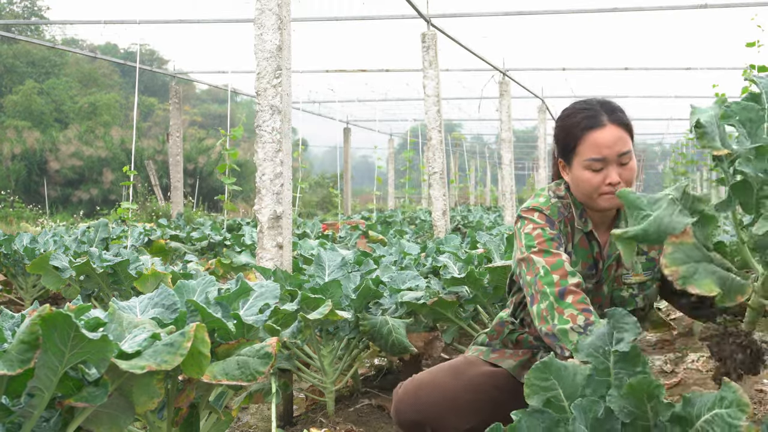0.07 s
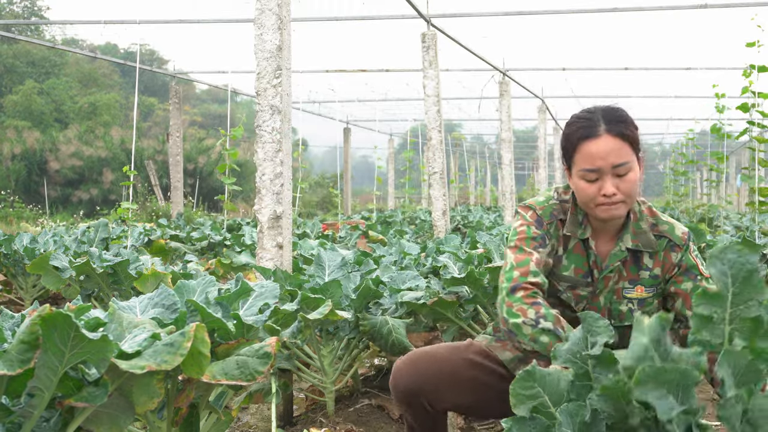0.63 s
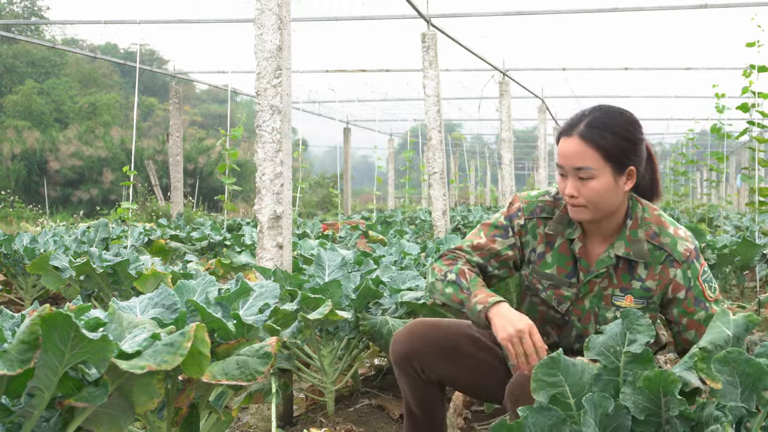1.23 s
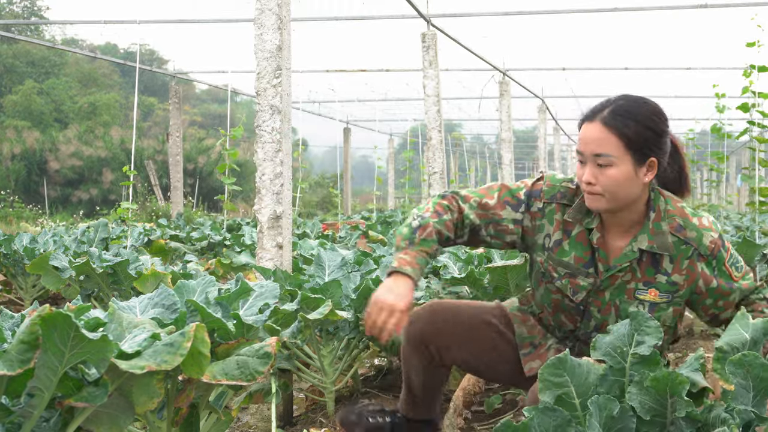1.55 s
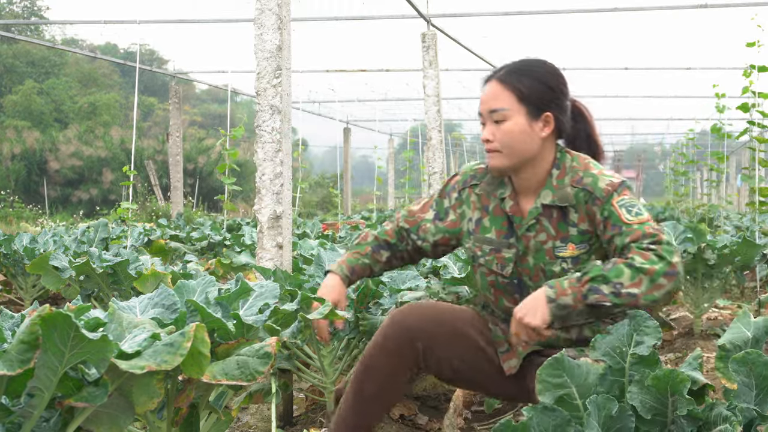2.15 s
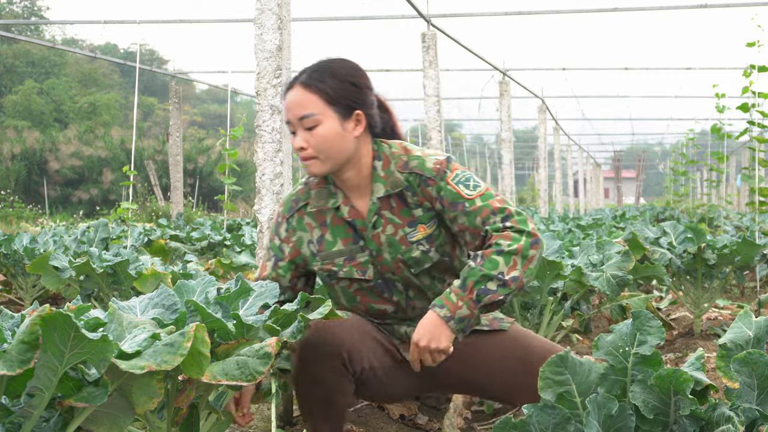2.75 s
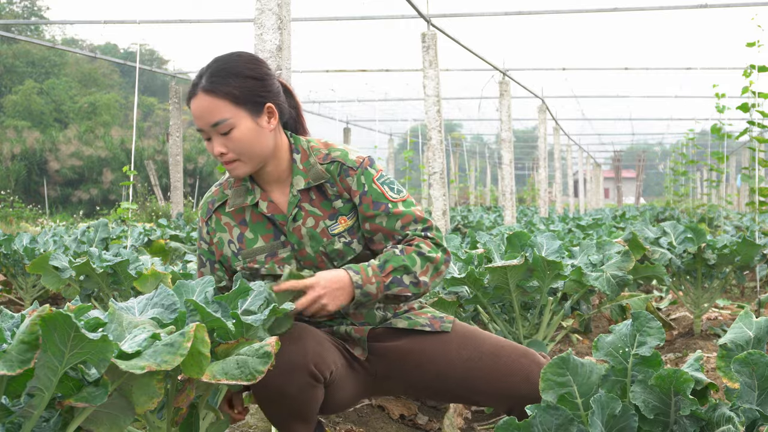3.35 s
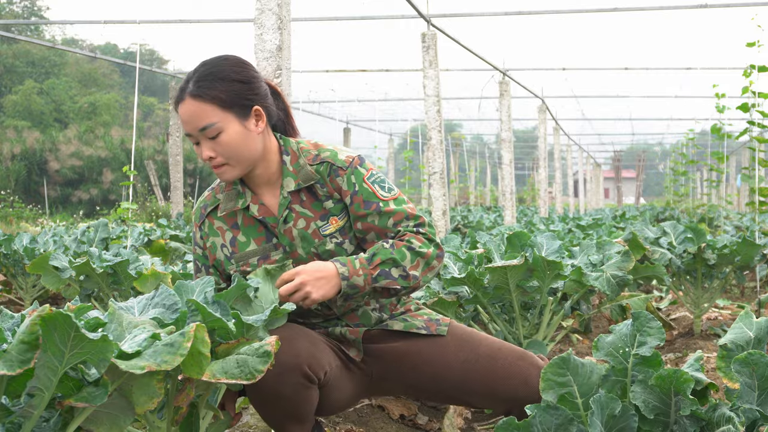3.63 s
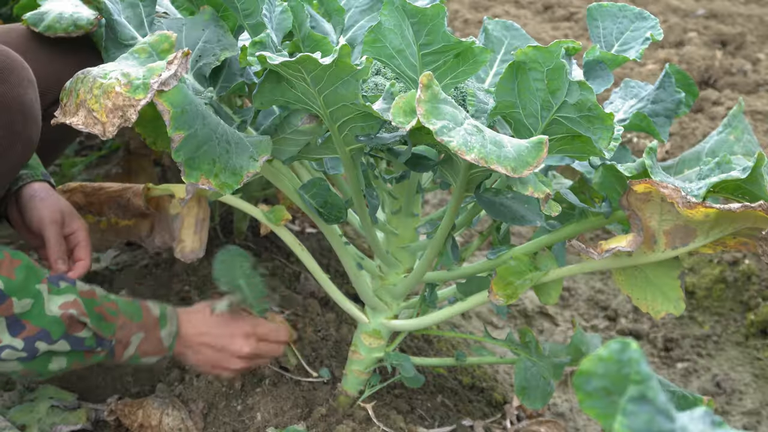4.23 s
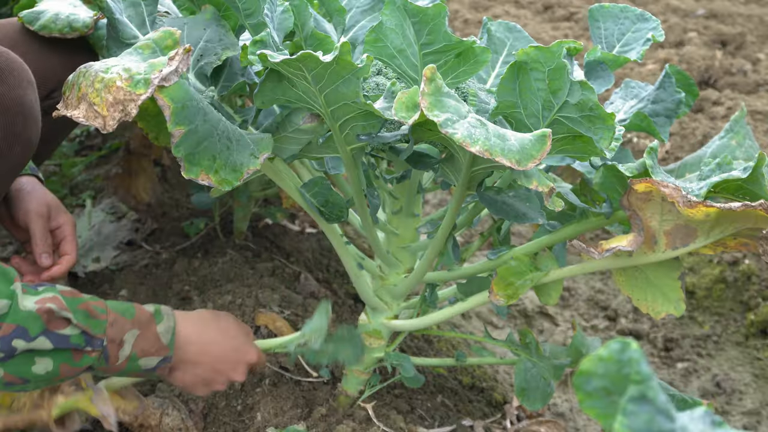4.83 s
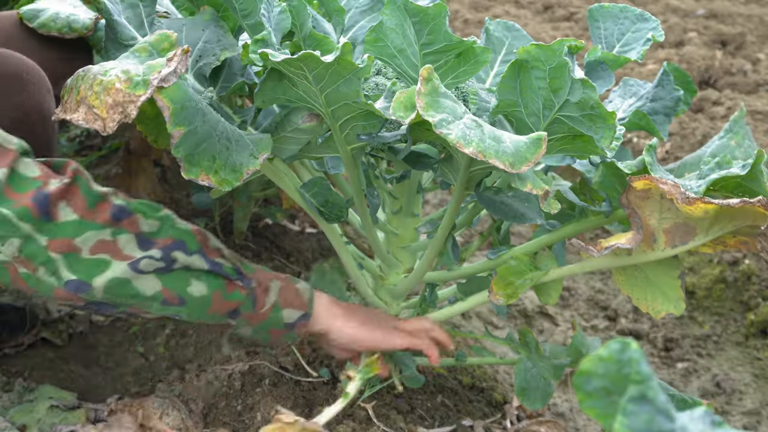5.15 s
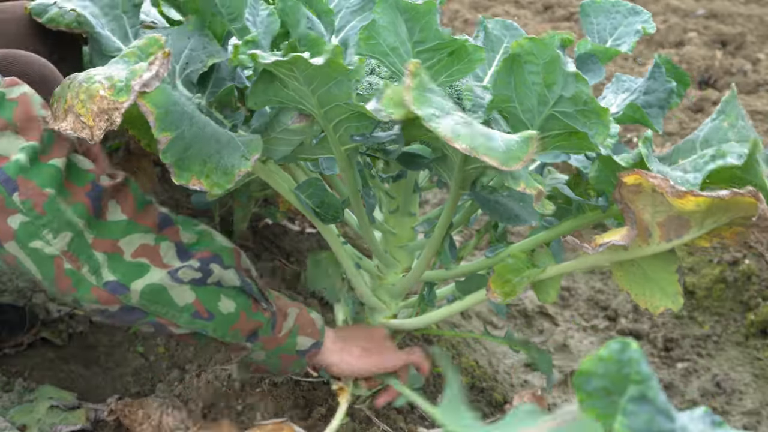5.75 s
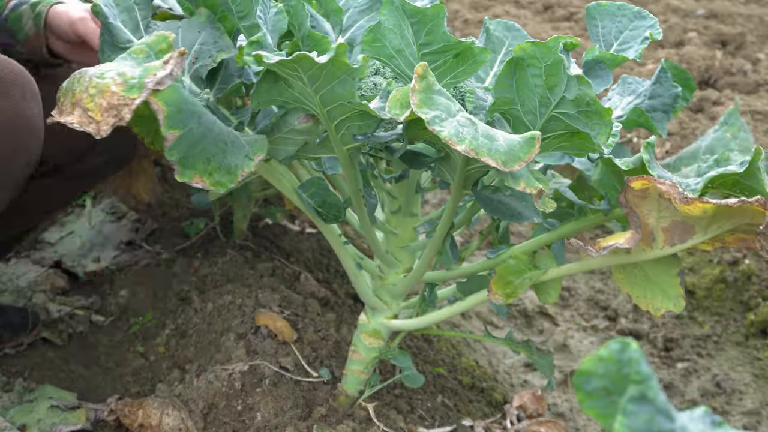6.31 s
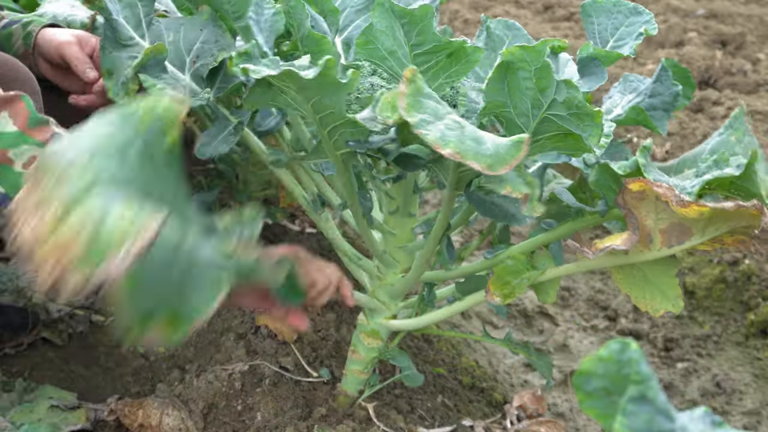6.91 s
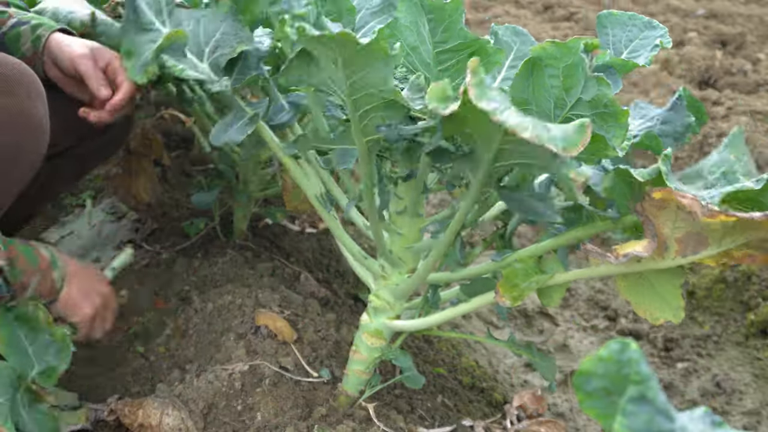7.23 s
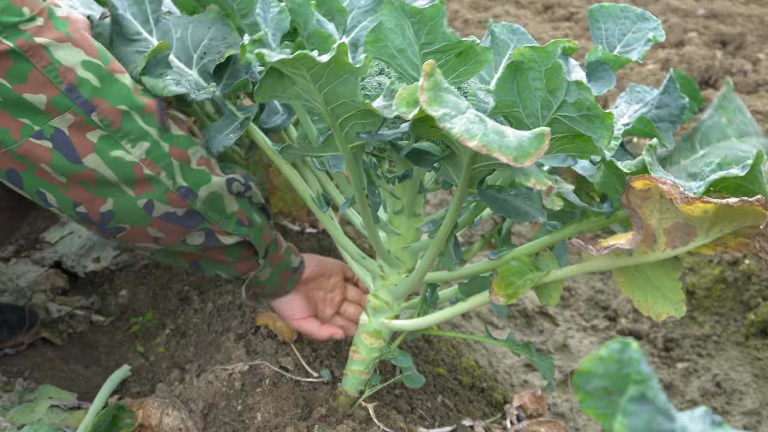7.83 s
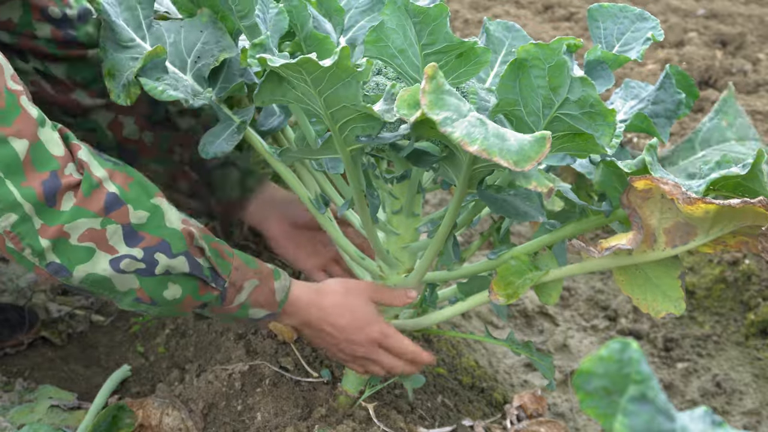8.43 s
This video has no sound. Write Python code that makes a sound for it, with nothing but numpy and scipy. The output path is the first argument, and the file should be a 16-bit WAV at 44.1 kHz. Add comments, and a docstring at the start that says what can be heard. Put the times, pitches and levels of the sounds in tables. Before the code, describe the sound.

In an open field, with a steady hush, low distant traffic and scattered birdsong, hands work on a leafy vegetable close to the microphone. Leaves rustle first, then after a quieter spell come juicy snaps of stalks, stem knocks, a short creak and quick brushes of sleeve and leaf. Near the end a thick stalk cracks loudly and the root thuds softly, while a thin, far horn holds one blast.

```python
"""Leaves are broken off a cauliflower by hand, over far road rumble, an engine and the hush of a field.
A big leaf is laid aside, rustling in tiny slips and crinkling; birds whistle and call from 1 s.
Insect hiss fades by 4 s. Then stalks crack as fibres tear, the stem knocks, a twisted stalk creaks.
A nearer bird sings at 5.6 s. A far horn starts one blast at 6.8 s; during it the thickest stalk
gives way and the root thuds in the soil."""
import sys
import numpy as np
from scipy import signal
from scipy.io import wavfile

SR = 44100
rng = np.random.default_rng(int(sys.argv[2]) if len(sys.argv) > 2 else 0)


def wav_record(signal):
    """Record a signal, one row per channel, as 16-bit PCM in the file named by sys.argv[1]."""
    frames = np.transpose(np.atleast_2d(signal))
    bounded = np.clip(frames, -1, 1)
    # unit amplitude maps onto the largest positive 16-bit level
    quanta = np.round(bounded * 32767).astype(np.int16)
    wavfile.write(sys.argv[1], SR, quanta)


N = 377937
TIME_S = np.arange(N) / SR

# far road: t/s, rel. level/dB
ROAD_LEVEL = [(0, -51), (1.3, -50.3), (1.7, -51.8), (3.9, -51.5), (4.3, -47.8), (5.4, -50.8), (6.0, -48.3),
              (7.1, -48.3), (7.55, -50.5), (7.85, -47.3), (8.57, -48.7)]
# road spectrum: f/Hz, rel. density/dB
ROAD_SPECTRUM = [(28, -28), (40, -1), (55, 3), (75, 5.5), (120, 5), (170, 0.5), (240, -12), (330, -19)]
# engine: t/s, level/dB
ENGINE_LEVEL = [(0, -68), (.3, -44), (.48, -58), (.7, -47), (1.9, -59), (4.7, -65), (5.1, -57), (8.57, -56)]
# insects: t/s, level/dB
INSECT_LEVEL = [(0, -66.5), (2, -67), (3.6, -67.5), (3.9, -80)]
# field hush: t/s, level/dB
HUSH_LEVEL = [(0, -50), (1.5, -49.5), (3.3, -49.5), (3.9, -52), (5, -49), (7, -49.5), (8.57, -50)]
# hush spectrum: f/Hz, rel. density/dB
HUSH_SPECTRUM = [(200, -7), (400, -3), (800, -2.5), (1400, 0), (2200, 0.5), (3400, 3.5), (5000, 0),
                 (6500, -4), (8300, -21.5), (10000, -20), (15500, -28)]
# road and hush: f/Hz, L-R correlation
FIELD_CORRELATION = [(60, .999), (150, 0.99), (600, 0.66), (1500, 0.806), (3000, 0.71), (5000, 0.59),
                     (12000, 0.133)]
# leaf rubbing, one curve per handling: t/s, rel. body/dB, rel. treble/dB
HANDLINGS = [
    [(0.2, -58, -67), (0.38, -46.8, -60), (0.55, -45, -57), (0.66, -41, -54), (0.8, -47, -58.5),
     (1.15, -51, -76), (1.6, -55.5, -75)],
    [(4.04, -56, -75), (4.09, -49, -75), (4.19, -56, -75), (4.55, -55.5, -74)],
    [(4.66, -51, -58), (4.8, -50.5, -58), (5.08, -49, -53), (5.21, -45, -53), (5.4, -56, -61)],
    [(5.66, -54, -63), (5.74, -42, -53), (5.92, -46.5, -57), (6.11, -42.5, -54), (6.19, -56.5, -62)],
    [(6.38, -50.5, -71), (6.56, -48.5, -69), (6.77, -48.5, -57), (6.94, -56, -61), (7.11, -46, -57),
     (7.23, -51, -65), (7.42, -48.5, -70), (7.8, -53.5, -68)],
    [(7.95, -54.7, -71), (8.35, -53.5, -75), (8.57, -48, -72)],
]
# rubbing spectrum: f/Hz, rel. density/dB
LEAF_SPECTRUM = [(150, -7), (350, -2), (700, -2), (1000, -1), (1400, -1), (2600, 3), (4500, -1),
                 (7000, -18.5), (10000, -20.5), (15500, -31)]
# rubbing: f/Hz, L-R correlation
LEAF_CORRELATION = [(200, 0.83), (2000, 1), (5000, 1), (12000, 0.23)]
# wipes of hand, sleeve and leaf: t/s, length/s, level/dB, f/Hz
WIPES = [(0.298, 0.033, -51, 1300), (1.997, 0.025, -54.5, 560), (4.21, .09, -54, 2240),
         (4.65, 0.025, -45, 11000), (4.683, 0.021, -37.5, 10300), (4.763, 0.044, -46, 3320),
         (4.885, .13, -46, 4120), (5.157, 0.037, -41, 2800), (5.3, 0.061, -45.5, 3850),
         (5.841, 0.044, -36, 3900), (6.353, 0.046, -43, 4630), (6.42, 0.04, -46, 3630),
         (6.482, 0.033, -42.5, 2080), (6.549, 0.088, -45.5, 1440), (6.75, .052, -48, 3850),
         (7.072, 0.029, -34.5, 4170), (7.307, 0.059, -41, 3020)]
# stalks and ribs breaking: t/s, crack level/dB, crack f/Hz, pop level/dB, pop f/Hz
CRACKS = [(0.471, -36, 3000, -26, 1460), (0.7368, -16.5, 4700, -30, 2500), (4.0593, -20, 5050, -18, 2360),
          (4.1, -25, 2900, -22.5, 1820), (4.208, -41, 2600, -30.5, 1840),
          (4.4008, -39.5, 2800, -34.5, 3000), (5.1535, -25.3, 5640, -28, 2230),
          (5.206, -25.5, 4000, -23, 3050), (5.337, -34, 5470, -31, 1990), (5.6731, -8, 3900, -16, 3860),
          (6.3593, -31.5, 5600, -46, 2500), (6.4785, -30.5, 4000, -30, 1494), (6.607, -33, 2400, -32, 1040),
          (6.8415, -22, 8900, -40, 3750), (7.0347, -7.5, 4800, -7, 2400), (7.055, -25, 6000, -27, 2280),
          (7.085, -33, 5000, -25, 2300), (7.0906, -15.5, 7420, -21, 2300)]
# large far birds: t/s, length/s, f/Hz, level/dB
HOARSE_CALLS = [(1.001, 0.24, 1452, -60), (2.738, 0.18, 1437, -59.5), (5.319, 0.11, 780, -52.7),
                (8.107, .18, 805, -57.5)]
# single bird notes: t/s, length/s, start f/Hz, end f/Hz, rel. level/dB
SINGLE_NOTES = [(1.346, .05, 3600, 2600, -48.5), (1.773, .06, 5300, 4800, -51.5),
                (2.307, .12, 5700, 4700, -55.5), (3.345, .018, 5100, 3700, -42),
                (3.488, .11, 4550, 4350, -49.5), (3.58, .021, 4900, 4750, -44),
                (4.985, .1, 6900, 6650, -52), (5.083, .038, 6000, 5400, -44.5),
                (5.21, .07, 5600, 5400, -48.5), (5.366, .19, 4750, 3880, -49.7),
                (5.604, .026, 6050, 5850, -34), (7.565, .041, 6250, 6350, -52),
                (7.718, .077, 5700, 4000, -52), (7.797, .13, 5050, 4950, -54.5)]
# two ticks, arched fall, rise: offset/s, length/s, start f/Hz, mid f/Hz, end f/Hz, rel. level/dB
SWOOP_MOTIF = [(0, .034, 7750, 7250, 6200, -9), (.038, .028, 7750, 7200, 6300, -7.5),
               (.142, .036, 5500, 5900, 6050, -5), (.176, .082, 6050, 4720, 3260, 0),
               (.387, .046, 3200, 3680, 4650, -2.3)]
# its repeats: t/s, rel. level/dB, time stretch
SWOOP_REPEATS = [(2.673, -47.3, .99), (3.158, -43.8, 1.01), (3.661, -52.5, 1.02)]
# stem jolts: t/s, level/dB, pitch ratio
STEM_JOLTS = [(5.674, -15.5, 1.0), (7.0352, -17, .65), (4.06, -34.5, 2.1), (4.686, -39, 1.201),
              (4.697, -34.5, 1.25), (7.055, -29, 0.74), (7.0906, -27.5, 0.69)]
# stem and leaf modes at ratio 1: f/Hz, rel. level/dB, t60/s
STEM_MODES = [(330, -13, 0.055), (417, -7, 0.022), (553, -6, 0.02), (710, -4, 0.026), (892, -4, 0.025),
              (1140, -2, 0.0088), (1500, -1, .014), (1630, 0, 0.0197), (2040, -11.5, 0.038),
              (2330, -6.5, 0.019), (2880, -10, 0.03), (3460, -5, 0.013), (4070, -29, 0.0084)]
# two rising whistles amid flicks: offset/s, length/s, start f/Hz, mid f/Hz, end f/Hz, rel. level/dB
SLUR_MOTIF = [(0, .009, 6300, 5450, 4750, -.5), (.018, .04, 4750, 4750, 4980, -1.5),
              (.051, .009, 5200, 5700, 6500, -8), (.066, .06, 4500, 4800, 5150, 1),
              (.123, .008, 5250, 5950, 6800, -3)]
# its repeats: t/s, rel. level/dB, time stretch
SLUR_REPEATS = [(5.756, -35.5, 1), (5.979, -35, 1.08)]
# horn partials: f/Hz, rel. level/dB
HORN_SPECTRUM = [(3295, -5.5), (3335, -6), (3745, -6), (3797, -2), (4160, -12), (4275, -15)]

SWOOP_PAN_DB, SLUR_PAN_DB, CHIRP_PAN_DB = 6.5, -2, 5   # left minus right


def from_db(db):
    """Decibels to gain."""
    return 10 ** (np.asarray(db) / 20)


def unit_rms(x):
    """Scale to rms 1."""
    return x / np.sqrt(np.mean(x ** 2) + 1e-20)


def gains(curve):
    """Gain over time per dB column; zero from 50 ms outside the curve."""
    times, *columns = np.transpose(curve)
    inside = (TIME_S >= times[0] - .05) & (TIME_S <= times[-1] + .05)
    out = np.zeros((len(columns), N))
    out[:, inside] = [from_db(np.interp(TIME_S[inside], times, db)) for db in columns]
    return out


def at_hz(points, hz):
    """Interpolate over log frequency."""
    points_hz, values = np.transpose(points)
    return np.interp(np.log(hz), np.log(points_hz), values)


def band(x, low_hz, high_hz, order=2):
    """Causal band-pass."""
    edges_hz = [min(low_hz, .35 * SR), min(high_hz, .45 * SR)]
    return signal.sosfilt(signal.butter(order, edges_hz, "band", fs=SR, output="sos"), x)


def add(out, at_s, sound):
    """Mix a sound in, in place."""
    start = max(round(at_s * SR), 0)
    out[..., start:start + sound.shape[-1]] += sound[..., :max(N - start, 0)]


def white():
    """Two independent white noises."""
    return rng.standard_normal((2, N))


def stereo(mid, side, correlation):
    """Two independent signals to a correlated pair."""
    return np.sqrt((1 + correlation) / 2) * mid + np.sqrt((1 - correlation) / 2) * np.array([side, -side])


def coloured(spectrum, correlations, excite):
    """Stereo noise shaped in half-octave bands; rms 1."""
    low_hz, high_hz = spectrum[0][0], spectrum[-1][0]
    edges_hz = np.geomspace(low_hz, high_hz, round(2 * np.log2(high_hz / low_hz)) + 1)
    sources = [excite(), excite()]
    mid, side = np.zeros((2, N))
    for k, (lower, upper) in enumerate(zip(edges_hz, edges_hz[1:])):
        hz = np.sqrt(lower * upper)
        gain, correlation = from_db(at_hz(spectrum, hz)), at_hz(correlations, hz)
        common, apart = band(sources[k % 2], lower, upper)
        mid += gain * np.sqrt(1 + correlation) * common
        side += gain * np.sqrt(1 - correlation) * apart
    return unit_rms(np.array([mid + side, mid - side]))


def wavering(hz, blur, rates_hz, size=N):
    """Tone with its pitch blurred by air and echoes; rms 1."""
    pitch_hz = hz * (1 + blur * unit_rms(band(rng.standard_normal(size), *rates_hz)))
    return unit_rms(np.sin(2 * np.pi * np.cumsum(pitch_hz) / SR))


def scatter(x, t60_s, top_hz, delay_s):
    """Diffuse echo off foliage and soil, wider in the treble; unit power gain."""
    t = np.arange(SR // 2) / SR
    mid, side = rng.standard_normal((2, len(t))) * from_db(-60 * t / t60_s) * (t > delay_s)
    side = band(side, 3900, 10500, order=1)
    tail = band(stereo(mid, side, 0), 120, top_hz, order=1)
    tail /= np.sqrt(np.sum(tail ** 2, axis=1, keepdims=True))
    return signal.fftconvolve(np.atleast_2d(x), tail, axes=1)[:, :N]


def road():
    """Low rumble of far traffic."""
    return from_db(.5) * gains(ROAD_LEVEL)[0] * coloured(ROAD_SPECTRUM, FIELD_CORRELATION, white)


def engine():
    """Drone on the road: one wavering tone."""
    return gains(ENGINE_LEVEL)[0] * wavering(hz=125, blur=.035, rates_hz=(4, 14))


def insects():
    """Thin narrow-band hiss."""
    return gains(INSECT_LEVEL)[0] * unit_rms(band(white(), 8000, 8940, order=4))


def hush():
    """Even broadband noise of the open field."""
    return gains(HUSH_LEVEL)[0] * coloured(HUSH_SPECTRUM, FIELD_CORRELATION, white)


def whistle(length_s, start_hz, mid_hz, end_hz, waver):
    """Bird note: a sine gliding through three pitches; strong waver makes it hoarse."""
    progress = np.linspace(0, 1, round(length_s * SR))
    glide_hz = np.polyval(np.polyfit([0, .5, 1], [start_hz, mid_hz, end_hz], 2), progress)
    flutter = unit_rms(band(rng.standard_normal(len(progress) + 2000), 30, 220))[2000:]
    phase = 2 * np.pi * np.cumsum(glide_hz * (1 + waver * flutter)) / SR
    return unit_rms(np.sin(phase) * signal.windows.tukey(len(progress), .25))


def flock(per_s, level_db):
    """Random falling twitters at the field's edge."""
    out = np.zeros(N)
    for when, pitch, length in rng.random((int(per_s * N / SR), 3)):
        hz = 3300 + 2300 * pitch
        note = whistle(.025 + .06 * length, 1.2 * hz, hz, hz, waver=.011)
        add(out, when * N / SR, from_db(level_db) * note)
    return out


def slips(per_s, size_db, fade_s):
    """Envelope of tiny, uneven stick-slip releases; rms 1."""
    released = rng.random(N) < per_s / SR
    sizes = released * from_db(size_db * np.minimum(rng.exponential(1, N), 4))
    power = signal.lfilter([1], [1, -np.exp(-2 / (fade_s * SR))], sizes ** 2 + 1e-18)
    return unit_rms(np.sqrt(power))


def rustle(at_soil_s, airborne_cut_hz):
    """Waxy leaves slide in small slips: thin in the air, fuller at the soil, crisp when brisk."""
    body, treble = sum(gains(handling) for handling in HANDLINGS)
    # leaves hold still below a light touch
    body = np.sqrt(np.maximum(body ** 2 - from_db(-57) ** 2, 0))
    treble = np.sqrt(np.maximum(treble ** 2 - from_db(-63) ** 2, 0))
    grain = slips(per_s=1200, size_db=3.6, fade_s=.0024)
    rub = coloured(LEAF_SPECTRUM, LEAF_CORRELATION, lambda: white() * grain)
    rub = np.where(TIME_S < at_soil_s, band(rub, airborne_cut_hz, 12000, order=1), rub)
    fizz = unit_rms(band(stereo(*white(), .49) * grain, 4300, 9500))
    return from_db(2) * body * rub + from_db(2.5) * treble * fizz


def crinkles(per_s, crack_hz, pop_hz, range_oct):
    """Small ribs crack at random, following the rustle's treble; rows as CRACKS."""
    rows = []
    for handling in HANDLINGS:
        times, _, treble_db = np.transpose(handling)
        span_s = times[-1] - times[0]
        for when, size, colour, ring in rng.random((round(per_s * span_s), 4)):
            at_s = times[0] + when * span_s
            db = np.interp(at_s, times, treble_db) + 17 + 2.5 * (2 * size - 1)
            crack_ratio, pop_ratio = 2 ** (range_oct * (np.array([colour, ring]) - .5))
            rows.append((at_s, db, crack_hz * crack_ratio, db - 4, pop_hz * pop_ratio))
    return rows


def brushes():
    """Quick wipes: dense runs of slips that swell and fade."""
    out = np.zeros((2, N))
    grains = stereo(*white(), .88) * slips(per_s=1500, size_db=3, fade_s=.001)
    for at_s, length_s, level_db, hz in WIPES:
        stroke = grains[:, round(at_s * SR):][:, :round(length_s * SR)]
        swell = signal.windows.tukey(stroke.shape[1], .6)
        add(out, at_s, from_db(level_db) * unit_rms(band(stroke * swell, hz / 2.4, hz * 1.54)))
    return out


def snaps(rows, tear_s, pop_cycles, pop_rise_s, pop_lag_s):
    """Fibres tear in a short burst; the juicy stalk answers with a pop."""
    out, t = np.zeros((2, N)), np.arange(SR // 25) / SR
    for at_s, crack_db, crack_hz, pop_db, pop_hz in rows:
        mid, side = rng.standard_normal((2, len(t))) * np.exp(-t / tear_s)
        fibres = stereo(mid, band(side, 5000, 19000), .55)
        crack = band(fibres, crack_hz / 1.452, crack_hz * 1.18, order=1)
        crack /= np.sqrt(np.sum(crack ** 2) / (2 * SR / 1000))   # energy of 1 ms at rms 1
        add(out, at_s, from_db(crack_db) * band(crack, 300, 1.96 * crack_hz, order=1))
        pop_envelope = np.exp(-t * pop_hz / pop_cycles) * (1 - np.exp(-t / pop_rise_s))
        add(out, at_s + pop_lag_s, from_db(pop_db) * pop_envelope * np.sin(2 * np.pi * pop_hz * t))
    return out


def far_calls():
    """Hoarse, arched calls of larger birds."""
    out = np.zeros(N)
    for at_s, length_s, hz, level_db in HOARSE_CALLS:
        add(out, at_s, from_db(level_db) * whistle(length_s, hz * .96, hz * 1.02, hz, waver=.066))
    return out


def chirps(waver):
    """Note rows: single glides."""
    return [(at_s, length_s, start_hz, np.sqrt(start_hz * end_hz), end_hz, db, CHIRP_PAN_DB, waver)
            for at_s, length_s, start_hz, end_hz, db in SINGLE_NOTES]


def song(motif, repeats, pan_db, waver=.006):
    """Note rows: one bird repeats its motif."""
    return [(at_s + stretch * offset_s, stretch * length_s, *glide_hz, db + note_db, pan_db, waver)
            for at_s, db, stretch in repeats
            for offset_s, length_s, *glide_hz, note_db in motif]


def birds(notes):
    """Fainter notes are farther, with a larger share of echo; far calls and flock are echo only."""
    direct, far = np.zeros((2, N)), np.zeros(N)
    for at_s, length_s, *glide_hz, level_db, pan_db, waver in notes:
        note = whistle(length_s, *glide_hz, waver)
        pan = from_db([[pan_db / 2], [-pan_db / 2]])
        add(direct, at_s, from_db(level_db - 3.5) * pan * note)
        add(far, at_s, from_db(.86 * level_db - 14.5) * note)
    far += far_calls() + flock(per_s=6, level_db=-55.5)
    near_echo = from_db(-5) * scatter(direct, t60_s=.064, top_hz=9000, delay_s=.0034)
    return direct + near_echo + scatter(far, t60_s=.41, top_hz=13500, delay_s=.0086)


def knocks(rise_s, uneven_db):
    """The released stem rings in damped modes, lower for a thicker stalk."""
    out, t = np.zeros(N), np.arange(SR // 10) / SR
    for at_s, level_db, ratio in STEM_JOLTS:
        for k, (hz, mode_db, t60_s) in enumerate(STEM_MODES):
            gain = (-1) ** (k // 2) * from_db(level_db + mode_db + uneven_db * rng.standard_normal())
            envelope = from_db(-60 * t / t60_s) * (1 - np.exp(-t / rise_s))
            add(out, at_s, gain * envelope * np.sin(2 * np.pi * hz * ratio * t))
    return out


def creak(start_s, first_gap_s, gap_ratio, crack_hz, pop_hz):
    """A twisted stalk's fibres slip five times, ever quicker and harder; rows as CRACKS."""
    k = np.arange(5)
    times = start_s + first_gap_s * (np.cumsum(gap_ratio ** k) - 1) / gap_ratio
    return [(at_s, -29.5 + up_db, crack_hz, -24.5 + up_db, pop_hz) for at_s, up_db in zip(times, 1.3 * k)]


def tumble(start_s, first_gap_s, gap_ratio, flick_s=.013, fall=1.13, waver=.025):
    """Note rows: the nearer bird leads in with five falling flicks, ever slower, lower and louder."""
    k = np.arange(5)
    times = start_s + first_gap_s * (np.cumsum(gap_ratio ** k) - 1) / gap_ratio
    pitches_hz, levels_db = 6450 * .91 ** k, -37 + 1.3 * k
    return [(at_s, flick_s, hz * fall, hz, hz / fall, db, SLUR_PAN_DB, waver)
            for at_s, hz, db in zip(times, pitches_hz, levels_db)]


def horn(on_s, off_s, ramp_s, direct_db, flutter_db):
    """Only the diaphragm's upper partials carry this far, mostly as echo; moving air flutters them."""
    blast, t = np.zeros(N), np.arange(2 * SR) / SR
    tone = sum(from_db(db) * wavering(hz, blur=.0065, rates_hz=(8, 50), size=len(t))
               for hz, db in HORN_SPECTRUM)
    flutter = from_db(flutter_db * unit_rms(band(rng.standard_normal(len(t)), 3, 12)))
    held = np.clip(np.minimum(t, off_s - on_s - t) / ramp_s, 0, 1)
    add(blast, on_s, from_db(direct_db) * held * unit_rms(tone * flutter))
    return blast + from_db(.5) * scatter(blast, t60_s=.3, top_hz=8000, delay_s=.01)


def thud(at_s, level_db, hz, t60_s):
    """Low, damped swing of the root in the soil."""
    out, t = np.zeros(N), np.arange(SR // 10) / SR
    add(out, at_s, from_db(level_db - 60 * t / t60_s) * np.sin(2 * np.pi * hz * t))
    return out


def scene():
    """Close handling, its breaks scattered by nearby plants, before the open field."""
    cracks = CRACKS + creak(start_s=4.635, first_gap_s=.0186, gap_ratio=.895, crack_hz=7500, pop_hz=2040)
    cracks += crinkles(per_s=9, crack_hz=4800, pop_hz=2200, range_oct=1.1)
    breaks = snaps(cracks, tear_s=.0011, pop_cycles=2.55, pop_rise_s=.00028, pop_lag_s=.0003)
    breaks += knocks(rise_s=.000173, uneven_db=.5)
    breaks += thud(at_s=7.036, level_db=-30, hz=178, t60_s=.08)
    near_echo = from_db(-14) * scatter(breaks, t60_s=.035, top_hz=8000, delay_s=.002)
    far_echo = from_db(-28.5) * scatter(breaks, t60_s=.27, top_hz=4500, delay_s=.031)
    notes = song(SWOOP_MOTIF, SWOOP_REPEATS, SWOOP_PAN_DB)
    notes += tumble(start_s=5.565, first_gap_s=.015, gap_ratio=1.27)
    notes += song(SLUR_MOTIF, SLUR_REPEATS, SLUR_PAN_DB) + chirps(waver=.028)
    distant = birds(notes) + horn(on_s=6.78, off_s=7.83, ramp_s=.05, direct_db=-48, flutter_db=2.2)
    distant += road() + engine() + insects() + hush()
    leaves = rustle(at_soil_s=3, airborne_cut_hz=560) + brushes()
    return breaks + near_echo + far_echo + leaves + distant


def record(dry):
    """Soft-clipped peaks, 16 kHz low-pass."""
    rounded = .83 * np.tanh(dry / .79)
    return signal.sosfilt(signal.ellip(10, .2, 70, 16000, fs=SR, output="sos"), rounded)


dry = scene()
out = record(dry)
wav_record(out)
```